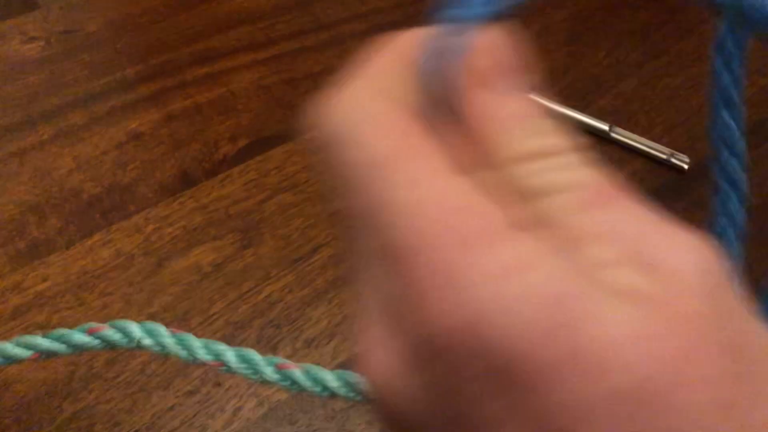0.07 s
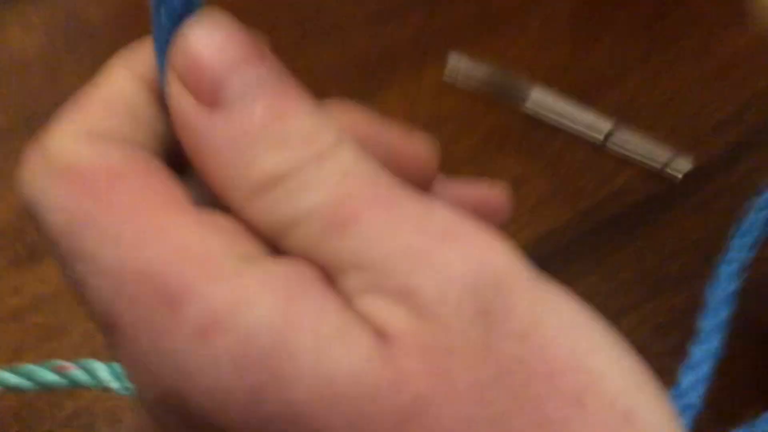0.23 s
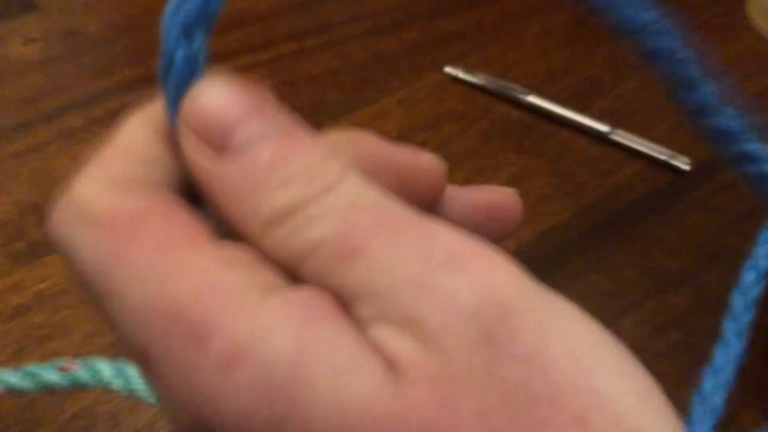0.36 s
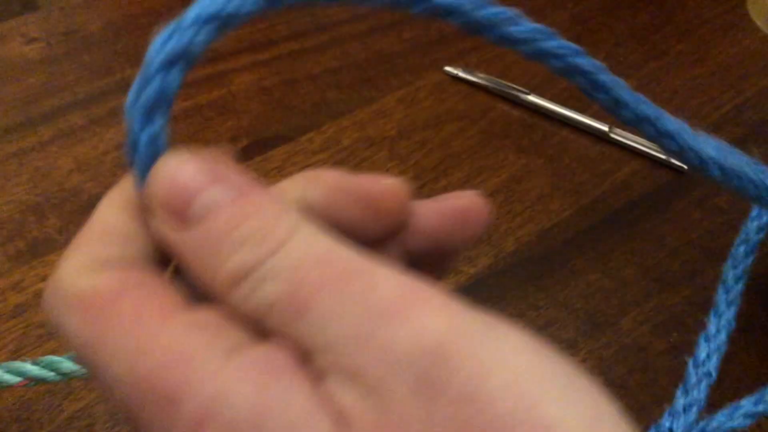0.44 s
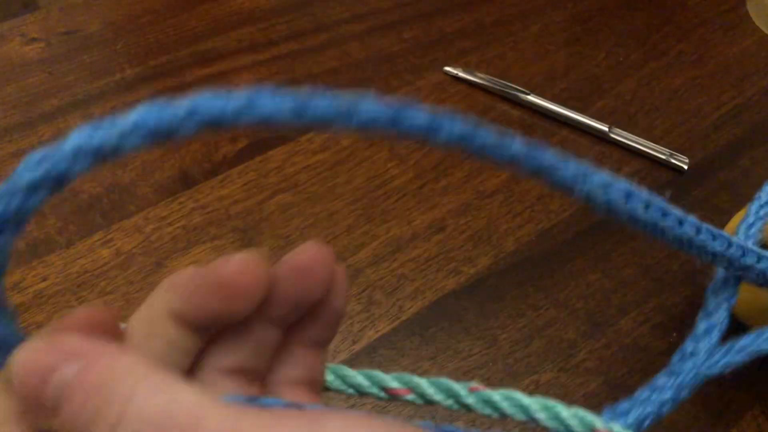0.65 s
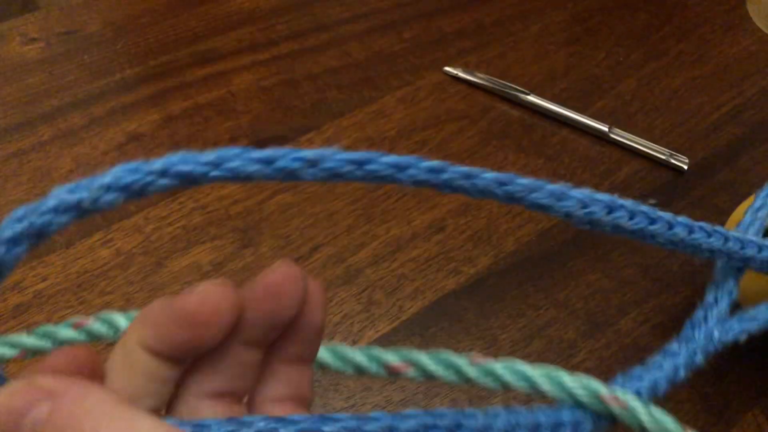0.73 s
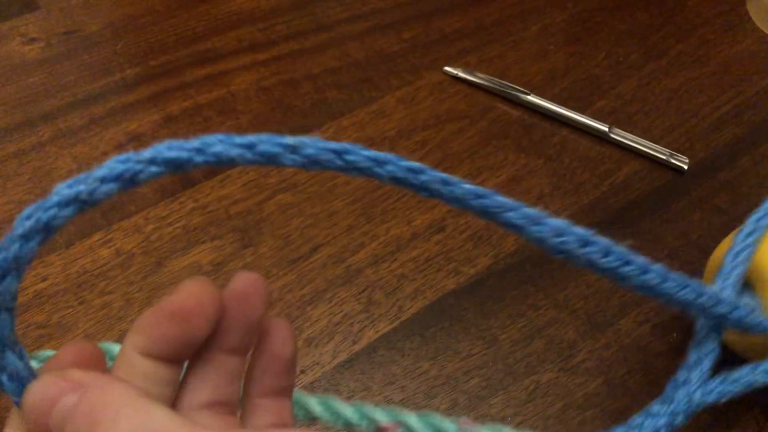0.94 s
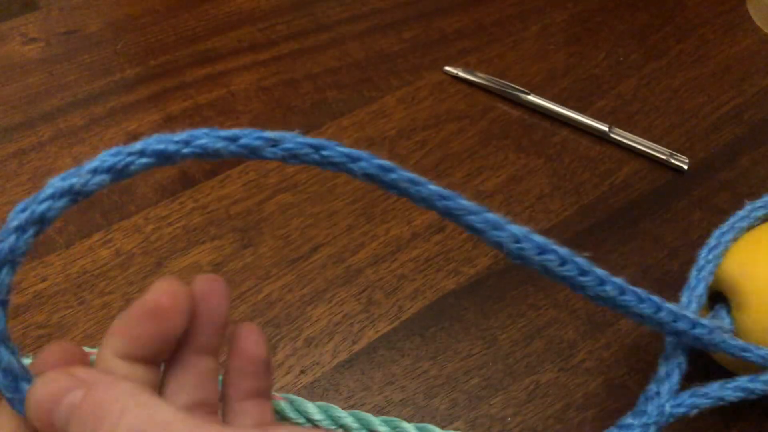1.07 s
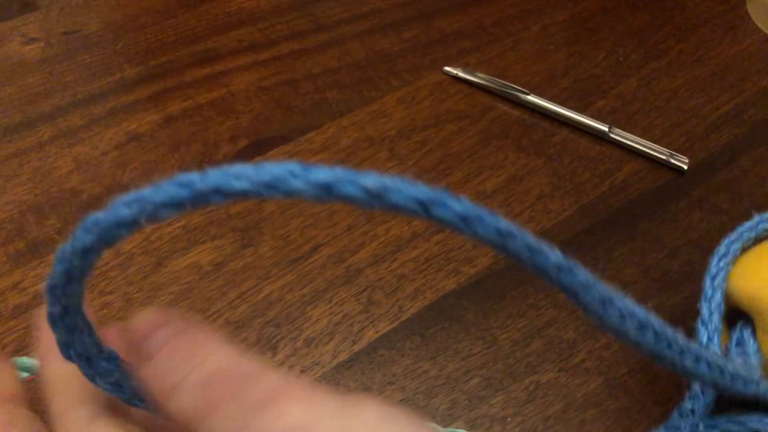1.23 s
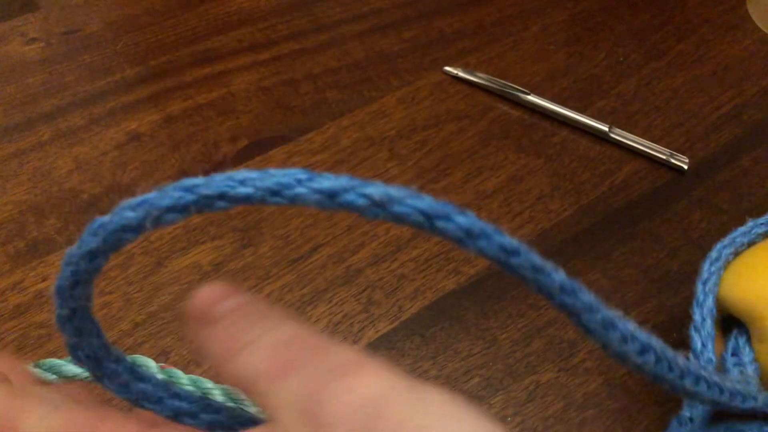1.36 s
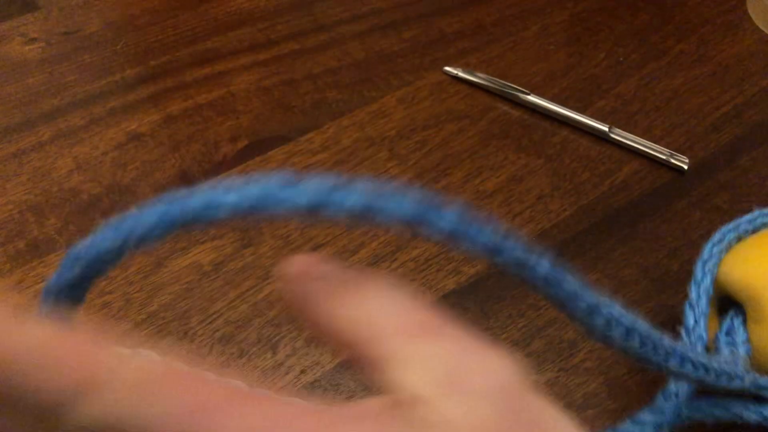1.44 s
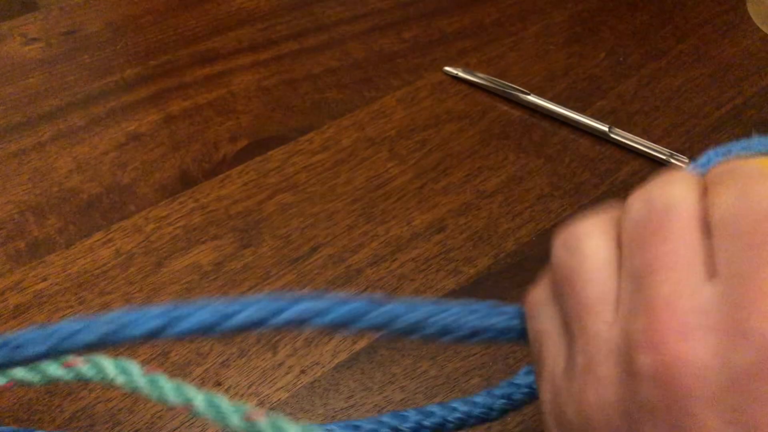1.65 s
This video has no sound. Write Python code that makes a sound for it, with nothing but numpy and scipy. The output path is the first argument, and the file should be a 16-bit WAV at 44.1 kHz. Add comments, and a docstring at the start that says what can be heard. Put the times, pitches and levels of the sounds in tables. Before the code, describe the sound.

Braided rope slides and rustles through hands over a wooden table, with one hard knock and metallic rattle

```python
"""Braided rope on a wooden table

Hands loop a braided rope over a table in a small room, close to the microphone. The braid hisses through
the fingers, rumbles over the wood and rasps on itself, all as coloured noise with tiny random slips; its
fibres tick as short noise snaps. An early hard bump cracks, rings the table's modes and rattles a piece of
steel, which rings as struck modes with a noisy clatter; later the rope drops softly on the wood.
"""
import sys
import numpy as np
from scipy import signal
from scipy.fft import rfft, irfft
from scipy.io import wavfile

SR = 44100
rng = np.random.default_rng(int(sys.argv[2]) if len(sys.argv) > 2 else 0)


def wrap_up_sound(samples):
    """Save the sound to the file named by the first command line argument, as 16-bit audio."""
    columns = np.atleast_2d(samples).T
    # keep every value between -1 and 1, then stretch to whole-number steps
    tamed = np.clip(columns, -1, 1)
    steps = np.round(tamed * 32767).astype(np.int16)
    wavfile.write(sys.argv[1], SR, steps)


N = 74970
TIME = np.arange(N) / SR
CUTOFF_HZ = 15900  # top of the whole sound


def from_db(db):
    """Decibels to gain."""
    return 10 ** (np.asarray(db) / 20)


def rms_one(x):
    """Scale to unit rms."""
    return x / np.sqrt(np.mean(x ** 2) + 1e-20)


def level(points):
    """Gain over time, drawn straight in dB between (time [s], level [dB]) points."""
    return from_db(np.interp(TIME, *np.transpose(points)))


def at_hz(rows, hz, column=1):
    """Read one column of a table on a log-frequency axis."""
    rows = np.array(rows)
    return np.interp(np.log(hz + 1e-9), np.log(rows[:, 0]), rows[:, column])


def coloured(x, colour):
    """Shape the spectrum of a steady signal; unit rms."""
    gain = from_db(at_hz(colour, np.fft.rfftfreq(N, 1 / SR)))
    return rms_one(irfft(rfft(x) * gain, N))


def cut(x, hz, kind, order=2):
    """Butterworth filter."""
    edge = np.clip(hz, 10, .47 * SR)
    return signal.sosfilt(signal.butter(order, edge, kind, fs=SR, output="sos"), x + 1e-18)


def dying(t60):
    """Exponential decay, 60 dB down after t60 seconds."""
    return np.exp(-np.log(1000) * TIME / t60)


def add(out, s, sound):
    """Mix a sound in from time s."""
    start = max(int(s * SR), 0)
    out[start:] += sound[:N - start]


def ringing(modes):
    """Struck modes, each a dying sine."""
    return sum(from_db(db) * dying(t60) * np.sin(2 * np.pi * hz * TIME) for hz, db, t60 in modes)


def dense_ring(rows, count=36):
    """Modes too close to tell apart: noise bands, each dying at its own rate; starts at unit rms."""
    edges = np.geomspace(rows[0][0], CUTOFF_HZ, count + 1)
    white = rng.standard_normal((2, N))  # neighbouring bands take turns
    out, steady = np.zeros(N), np.zeros(N)
    for k, (low, high) in enumerate(zip(edges, edges[1:])):
        hz = np.sqrt(low * high)
        band = cut(white[k % 2], [low, high], "band") * from_db(at_hz(rows, hz))
        out += band * dying(at_hz(rows, hz, column=2))
        steady += band
    return out / np.std(steady)


GRAIN_SPREAD_DB = 3.0  # scale of the random boost in slip size


def friction(slips_per_s, smooth):
    """Tiny slips of uneven size, at unit rms, on a bed of smooth rubbing noise."""
    boost = np.minimum(rng.exponential(1, N), 5)
    sizes = from_db(GRAIN_SPREAD_DB * boost) * rng.choice([-1, 1], N)
    slips = sizes * (rng.random(N) < slips_per_s / SR)
    return rms_one(slips) + smooth * rng.standard_normal(N)


# quiet room spectrum: (frequency [Hz], relative density [dB per Hz])
ROOM_COLOUR = [(25, 0), (45, 6.5), (80, 1), (170, 2.5), (400, -3.5), (1000, -10), (3000, -15.5),
               (8000, -20), (16000, -43.5)]
ROOM_DB = -63


def quiet_room():
    """A steady noise bed, weighted to the bass, under everything."""
    return from_db(ROOM_DB) * coloured(rng.standard_normal(N), ROOM_COLOUR)


FLICKER_DB, FLICKER_HZ = 2.04, 35  # rms swing; upper edge of its rate


def flicker():
    """A gain that wavers at random."""
    wander = cut(rng.standard_normal(2 * N), FLICKER_HZ, "low")[N:]  # skip the filter's start
    return from_db(FLICKER_DB * rms_one(wander))


# braid sliding through the fingers: (time [s], level [dB])
SLIDE_LEVEL = [(0, -56.5), (.03, -51.5), (.075, -49), (.12, -54.5), (.153, -46.5), (.165, -58),
               (.19, -61.5), (.203, -50), (.3, -73), (.5, -61.5), (.585, -57.5), (.625, -48), (.66, -56.5),
               (.72, -61), (.8, -62), (.96, -61.5), (.995, -50), (1.035, -48.5), (1.065, -53.5),
               (1.1, -60.5), (1.125, -55.5), (1.168, -53.5), (1.19, -57), (1.215, -56), (1.29, -66),
               (1.36, -59.5), (1.44, -62.5), (1.48, -80), (1.503, -52.5), (1.53, -62), (1.64, -63.5),
               (1.652, -51.5), (1.67, -53.5), (1.7, -52)]
# spectrum of the slide: (frequency [Hz], relative density [dB per Hz])
SLIDE_SPECTRUM = [(500, -1), (1200, 4.5), (2400, -1.5), (2850, 4.5), (3300, 2), (3950, 6.5), (4400, 5.5),
                  (7500, 3.5), (9500, 8), (12000, 2), (15500, 8.5)]
SLIDE_SLIPS_PER_S, SLIDE_SMOOTH = 5000, .7
SHEEN_FROM_HZ, SHEEN_SWING = 4500, 1.2  # above this the hiss swings wider, by this power
SHEEN_EVEN_DB = -50.5  # slide level at which the sheen is neither raised nor lowered


def finger_slide():
    """Dense slips hiss in the fingers, brighter when louder; each register wavers on its own."""
    pull = level(SLIDE_LEVEL)
    hiss = coloured(friction(SLIDE_SLIPS_PER_S, SLIDE_SMOOTH), SLIDE_SPECTRUM)
    body = cut(hiss, SHEEN_FROM_HZ, "low", order=3)
    extra_swing = (pull / from_db(SHEEN_EVEN_DB)) ** (SHEEN_SWING - 1)
    sheen = extra_swing * cut(hiss, SHEEN_FROM_HZ, "high", order=3)
    return pull * (flicker() * body + flicker() * sheen)


# rope dragging over the wood: (time [s], level [dB])
DRAG_LEVEL = [(0, -58.5), (.035, -46.5), (.085, -43), (.13, -50), (.19, -53.5), (.42, -44.5), (.5, -53.5),
              (.55, -47.5), (.64, -47), (.72, -50), (.79, -53), (.9, -55.5), (.99, -56), (1.09, -50),
              (1.125, -49.5), (1.18, -46), (1.23, -50), (1.3, -63), (1.335, -48.5), (1.4, -64.5),
              (1.445, -55), (1.52, -62.5), (1.6, -68), (1.7, -90.5)]
# spectrum of the drag: (frequency [Hz], relative density [dB per Hz])
DRAG_SPECTRUM = [(40, -22.5), (75, -11.5), (130, 1.5), (190, 2.5), (250, -5), (330, -2.5), (470, -15.5),
                 (900, -24), (1150, -15.5), (1400, -28), (2500, -27), (2850, -23.5), (3300, -31.5),
                 (3900, -23), (4700, -42.5), (10000, -44)]
DRAG_SLIPS_PER_S, DRAG_SMOOTH = 900, 1


def wood_drag():
    """Sparser slips and rubbing noise, coloured low, rumble over the table top."""
    return level(DRAG_LEVEL) * coloured(friction(DRAG_SLIPS_PER_S, DRAG_SMOOTH), DRAG_SPECTRUM)


# fibres snap past each other: (time [s], relative level [dB], lower edge [Hz])
FIBRE_SNAPS = [(0.0168, -27.5, 7100), (0.0231, -19.5, 6600), (0.0516, -34, 6000), (0.074, -30.5, 2000),
               (.109, -36, 6760), (0.1441, -29.5, 2900), (0.2062, -28.5, 2580), (0.5302, -23, 4640),
               (.6054, -33, 4000), (0.6321, -28, 3840), (.6707, -30.5, 3020), (0.699, -44, 1480),
               (0.8184, -70, 1480), (0.9357, -45, 5000), (1.0836, -43, 7000), (1.1695, -36, 3000),
               (1.2144, -47, 5000), (1.3147, -37, 4040), (1.415, -47, 4450), (1.4435, -45, 4463),
               (1.4959, -37, 5050), (1.5052, -42, 7100), (1.5101, -35, 7200), (1.554, -41.5, 6150),
               (1.5822, -37.5, 5020), (1.6027, -30, 6550), (1.6064, -35.5, 6530), (1.651, -27, 5050),
               (1.6564, -32, 4950)]
TICK_GAIN_DB = 6.5  # on every snap, after scaling to unit energy
TICK_T60_S, TICK_ROOM_DB, TICK_ROOM_T60_S = .005, -39.5, 0.16


def fibre_ticks():
    """Very short bright snaps with a faint room tail."""
    out = np.zeros(N)
    decay = dying(TICK_T60_S) + from_db(TICK_ROOM_DB) * dying(TICK_ROOM_T60_S)
    for s, db, edge_hz in FIBRE_SNAPS:
        snap = cut(rng.standard_normal(N) * decay, edge_hz, "high")
        snap = cut(snap, 3.66 * edge_hz, "low", order=1)
        add(out, s, from_db(db + TICK_GAIN_DB) * snap / np.linalg.norm(snap))
    return out


# rope and fingers land on the wood: (time [s], level [dB], thud pitch [Hz])
SOFT_LANDINGS = [(0.021, -35, 165), (.0765, -30.5, 380), (.105, -39, 122.4), (0.53, -37, 193),
                 (0.584, -38.5, 207), (.699, -37.5, 223), (0.817, -31.5, 126), (1.0148, -40, 920),
                 (1.0164, -26.5, 277), (1.0185, -24.5, 121), (1.025, -25, 334), (1.042, -36, 130),
                 (1.064, -31.5, 143), (1.146, -34, 123), (1.19, -35.5, 124), (1.44, -43, 154.2),
                 (1.548, -51, 160)]
# the hard bump and its rebounds: (time [s], level [dB], thud pitch [Hz])
HARD_BUMP = [(0.2283, -12.5, 1190), (0.2311, 2, 507), (.2353, -21, 1210), (0.243, -10.5, 394),
             (0.2577, -12.5, 413), (0.2671, -14, 447), (0.2782, -35, 297), (0.2887, -15, 330)]
# modes of the table top: (frequency [Hz], relative level [dB], t60 [s])
TOP_MODES = [(110.8, -17.5, 0.23), (131.7, -16.5, 0.31), (162.4, -17, 0.2), (184.8, -12.5, 0.13),
             (226.8, -12.5, 0.2), (265.9, -18, .24), (308.4, -11, .18), (341.4, -18.5, 0.22),
             (387.7, -11.5, 0.27), (411.2, -19, 0.21), (486, -26, .2), (517.8, -24.5, .16),
             (576.6, -17.5, .22), (657.3, -20, .18), (676, -24, 0.27), (1079, -5.5, 0.026)]
# dense upper modes of the wood and the room behind: (frequency [Hz], relative density [dB per Hz], t60 [s])
WOOD_AND_ROOM = [(43.72, -22, .5), (112.4, 4.5, 0.28), (298, -5, .3), (600, -3.5, 0.36), (800, -6, 0.34),
                 (1100, -6, 0.34), (2500, 0.5, 0.3), (3990, 1, 0.12), (7800, -12, .24), (16000, -13, .2)]
# light hard taps of the rope on the wood: (time [s], level [dB])
LIGHT_TAPS = [(0.0736, -41.5), (.612, -47.5), (0.6439, -42), (.6995, -45.5), (.8172, -49), (1.0216, -44.5),
              (1.124, -47.5), (1.169, -48.5)]
# what a light tap rings: (frequency [Hz], relative level [dB], t60 [s])
TAP_RING = [(1135, -11, 0.093), (1237, -7.5, 0.033), (1670, -11, 0.036), (2814, -3.5, 0.032),
            (2935, -12, 0.042), (3770, -8, 0.031), (3884, -24, 0.048), (5200, -16, 0.0079)]
TOP_MODES_DB, WOOD_AND_ROOM_DB = -2, -8
SOFT_RING_DB = -4.5  # the rope damps the top as it lands
THUD_CYCLES, THUD_DB = 9, -2  # cycles to fall 60 dB; level beside the ring
THUD_LOW_SHARE, CONTACT_BRIGHTNESS = .45, 1.7  # thud's lower edge, contact's upper edge, over the pitch
TABLE_LOW_HZ = 97.2


def table():
    """Each contact is a short damped thud that rings the same top, duller where its pitch is lower."""
    body = from_db(TOP_MODES_DB) * ringing(TOP_MODES)
    body = body + from_db(WOOD_AND_ROOM_DB) * dense_ring(WOOD_AND_ROOM)
    out = np.zeros(N)
    for contacts, ring_db in (SOFT_LANDINGS, SOFT_RING_DB), (HARD_BUMP, 0):
        for s, db, hz in contacts:
            thud = ringing([(hz, THUD_DB, THUD_CYCLES / hz)])
            thud = cut(thud, THUD_LOW_SHARE * hz, "high", order=1)
            contact = cut(from_db(ring_db) * body + thud, CONTACT_BRIGHTNESS * hz, "low")
            add(out, s, from_db(db) * contact)
    tap = ringing(TAP_RING)
    for s, db in LIGHT_TAPS:
        add(out, s, from_db(db) * tap)
    return cut(out, TABLE_LOW_HZ, "high", order=6)


# braid rasping over braid: (time of the middle [s], width [s], level [dB])
RASP_STROKES = [(0.086, 0.023, -47), (0.633, 0.026, -57), (1.167, 0.0076, -64), (1.653, 0.006, -56)]
# spectrum of the rasp: (frequency [Hz], relative density [dB per Hz])
RASP_SPECTRUM = [(200, -27), (600, 16.5), (1100, 9), (1800, 13.5), (3000, -6), (3800, 14), (6000, -9),
                 (12000, -32)]
RASP_SLIPS_PER_S, RASP_SMOOTH = 900, 0.44


def braid_rasps():
    """Slips of braid on braid swell and fade in short bell-shaped strokes."""
    strokes = sum(from_db(db) * np.exp(-.5 * ((TIME - s) / width) ** 2) for s, width, db in RASP_STROKES)
    return strokes * coloured(friction(RASP_SLIPS_PER_S, RASP_SMOOTH), RASP_SPECTRUM)


# sharp cracks at the start of the bump: (time [s], level [dB])
BUMP_CRACKS = [(0.2265, -33), (0.2356, -36.5)]
CRACK_HZ, CRACK_T60_S = 1800, .09  # lower edge; decay


def cracks():
    """The first hard touches of the bump spray short bright bursts of noise."""
    out = np.zeros(N)
    for s, db in BUMP_CRACKS:
        burst = cut(rng.standard_normal(N), CRACK_HZ, "high")
        burst = cut(burst, 2 * CRACK_HZ, "low", order=1)
        add(out, s, from_db(db) * rms_one(burst) * dying(CRACK_T60_S))
    return out


# the steel bounces: (time [s], level [dB], tilt above the first mode [dB per octave])
STEEL_TOUCHES = [(.2355, -33, -1), (.2416, -23, -10), (.2526, -20.5, -6), (.2592, -27, -1.5),
                 (.2808, -22, -8), (0.2945, -38.5, 5)]
# modes of the steel: (frequency [Hz], relative level [dB], t60 [s])
STEEL_RING = [(4692, -17, .22), (4771, 0, .42), (4876, -18, .25), (6110, -15, .3), (6232, -9, .36),
              (6352, -16, .3), (8594, -23, .2), (9221, -11, .25), (9383, -10, .27), (10228, -19, .42),
              (11540, -9, .14), (12486, -13, .17), (13290, -20, .12), (14530, -17, .13), (15620, -21, .12)]
# clatter of the steel and its echo in the room: (frequency [Hz], relative density [dB per Hz], t60 [s])
STEEL_CLATTER = [(996, -3.5, 0.33), (2012, 1, 0.49), (4300, 3.5, 0.23), (4860, -3.5, 0.65),
                 (5460, -21.5, .3), (6170, 1.5, 0.46), (6852, -9.5, 0.16), (9600, -7.5, .24),
                 (10500, -14, 0.39), (13000, -15, .22), (16000, -17, .2)]
CLATTER_DB = -12
STEEL_CHOKE_S, STEEL_KEPT_DB = .002, -22.5  # choking time constant; what survives the next touch


def steel():
    """The steel rings freely between touches; each chokes it, strikes it anew and clatters into the room."""
    out = np.zeros(N)
    clatter = from_db(CLATTER_DB) * dense_ring(STEEL_CLATTER, count=48)
    next_touch = [row[0] for row in STEEL_TOUCHES[1:]] + [N / SR]
    first_hz = STEEL_RING[0][0]
    for (s, db, tilt), end in zip(STEEL_TOUCHES, next_touch):
        modes = [(hz, mode_db + tilt * np.log2(hz / first_hz), t60) for hz, mode_db, t60 in STEEL_RING]
        choke = np.exp(-np.maximum(TIME - (end - s), 0) / STEEL_CHOKE_S)
        free = np.maximum(choke, from_db(STEEL_KEPT_DB))
        add(out, s, from_db(db) * (ringing(modes) * free + clatter))
    return out


def scene():
    """Rope, table and steel over the quiet room."""
    rope = finger_slide() + wood_drag() + fibre_ticks() + braid_rasps()
    bump = table() + cracks() + steel()
    return (quiet_room() + rope + bump)[None]


MIC_LOW_HZ = 54.6


def record(dry):
    """The highest peaks are rounded; the deep bass and the top are cut."""
    rounded = 1.1 * np.tanh(dry / 1.1)
    top_cut = signal.ellip(10, .2, 70, CUTOFF_HZ, fs=SR, output="sos")
    return signal.sosfilt(top_cut, cut(rounded, MIC_LOW_HZ, "high"))


dry = scene()
out = record(dry)
wrap_up_sound(out)
```